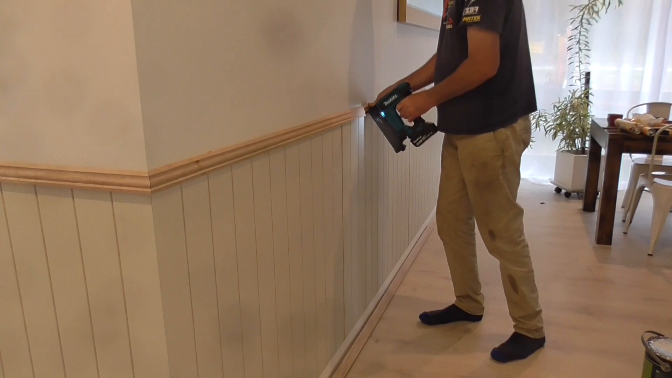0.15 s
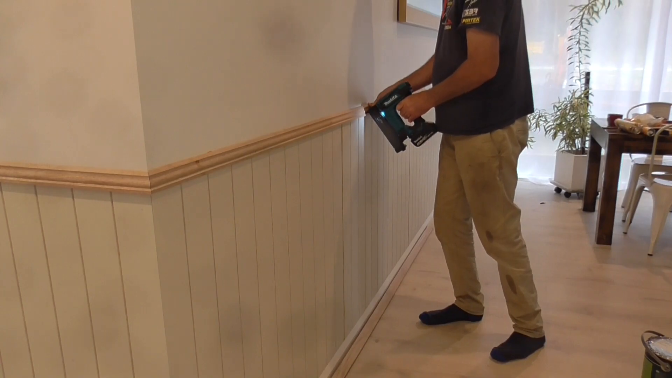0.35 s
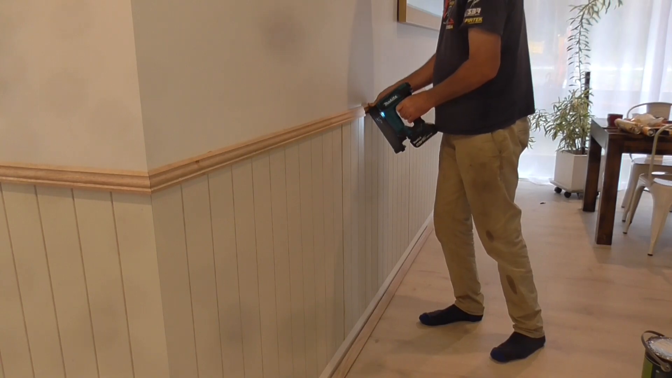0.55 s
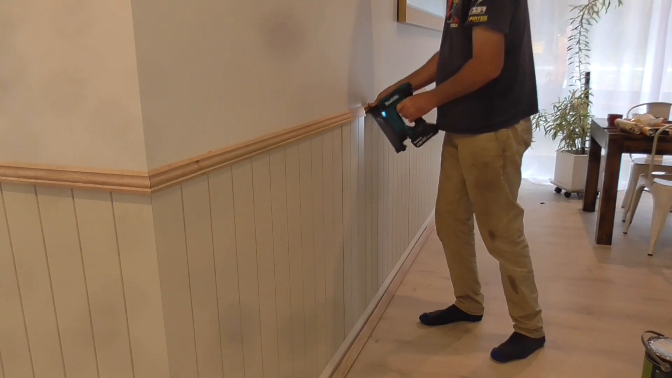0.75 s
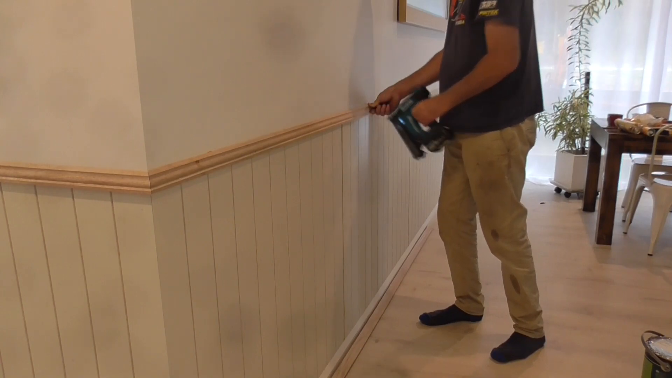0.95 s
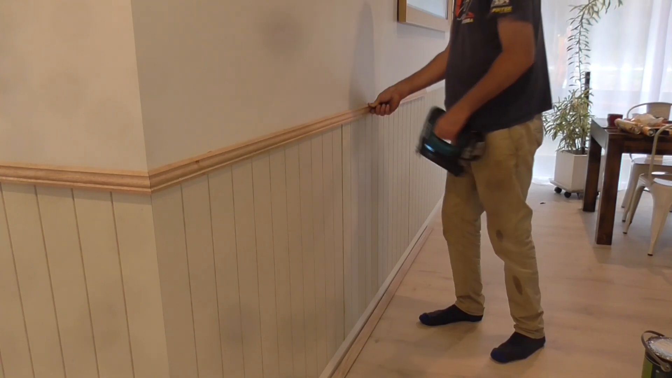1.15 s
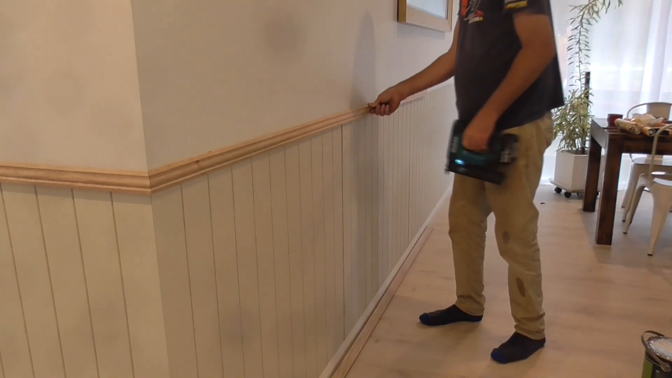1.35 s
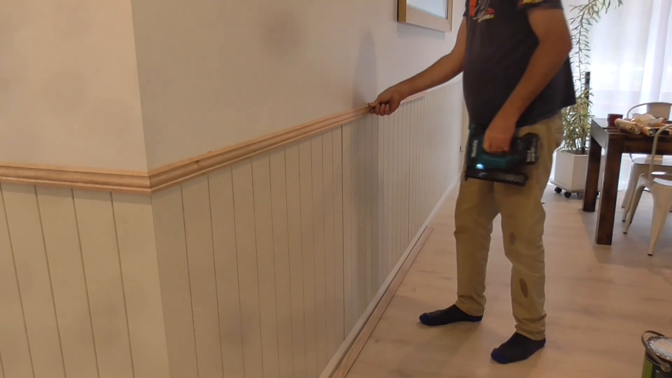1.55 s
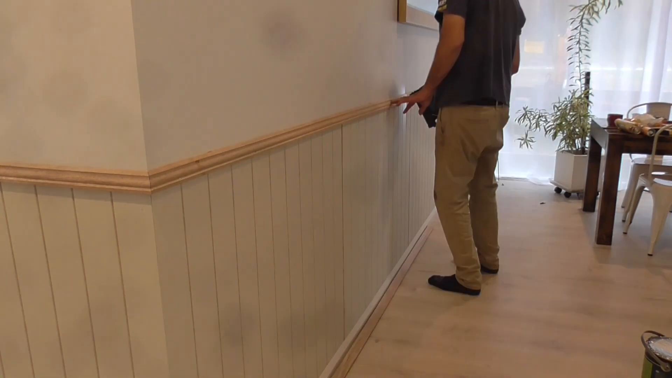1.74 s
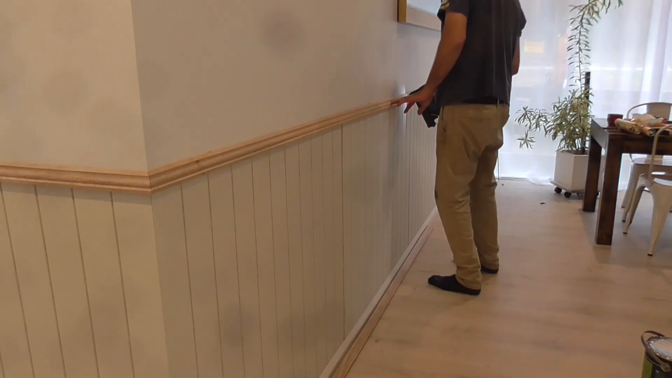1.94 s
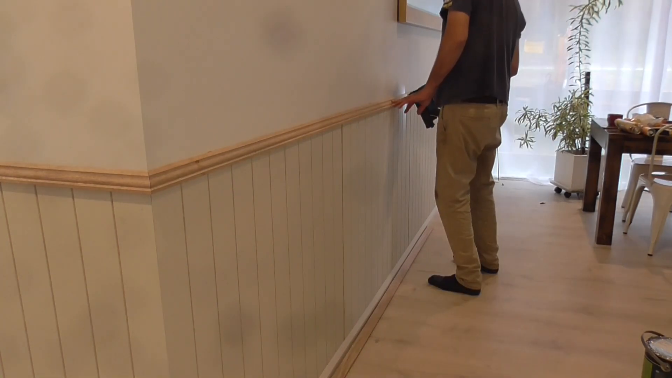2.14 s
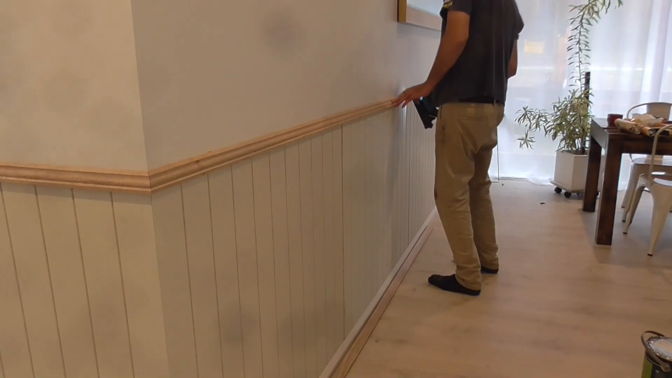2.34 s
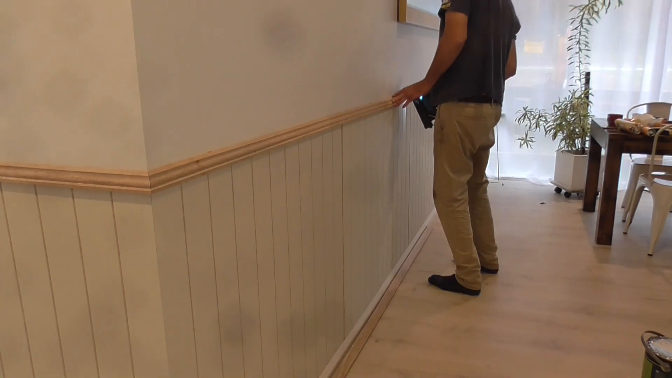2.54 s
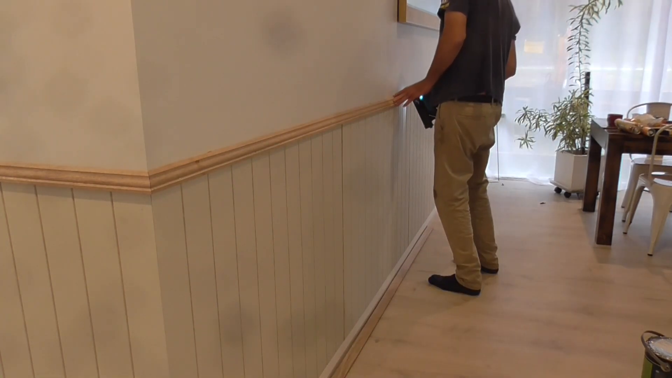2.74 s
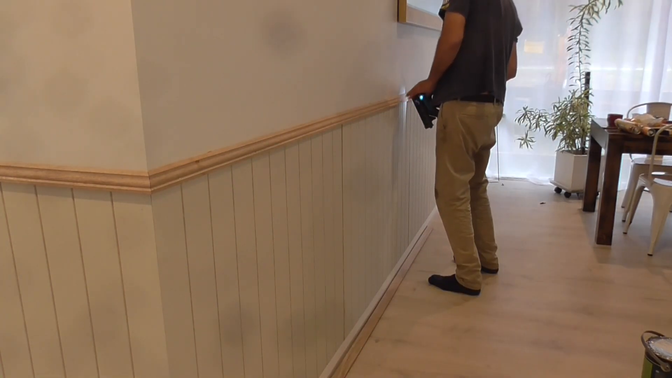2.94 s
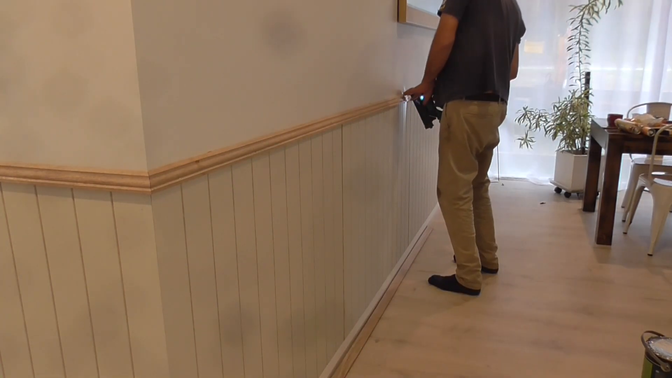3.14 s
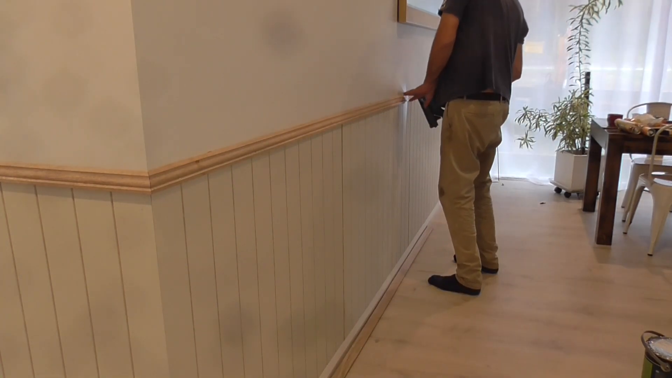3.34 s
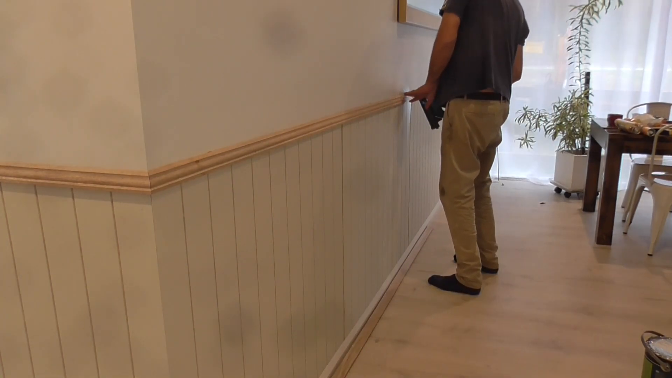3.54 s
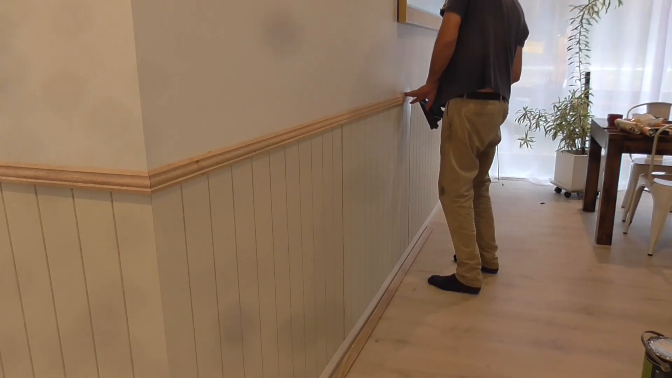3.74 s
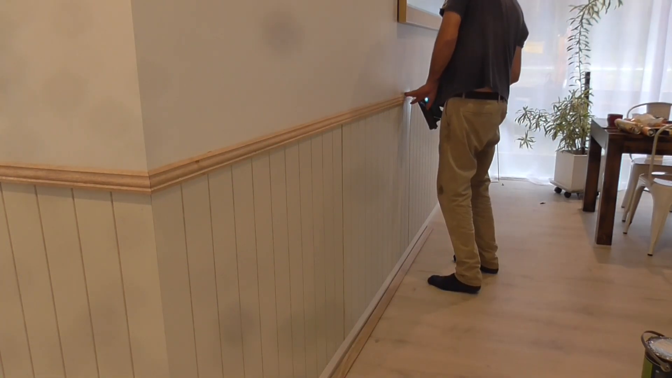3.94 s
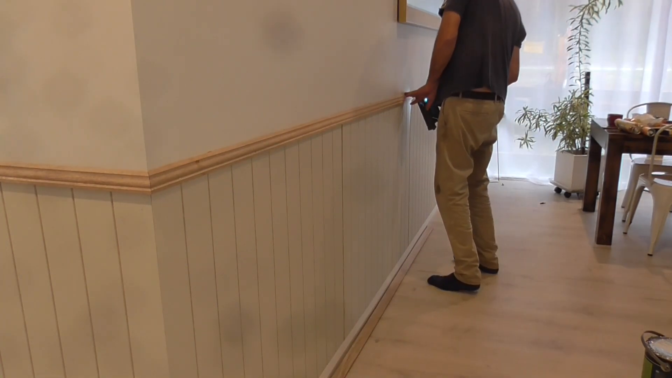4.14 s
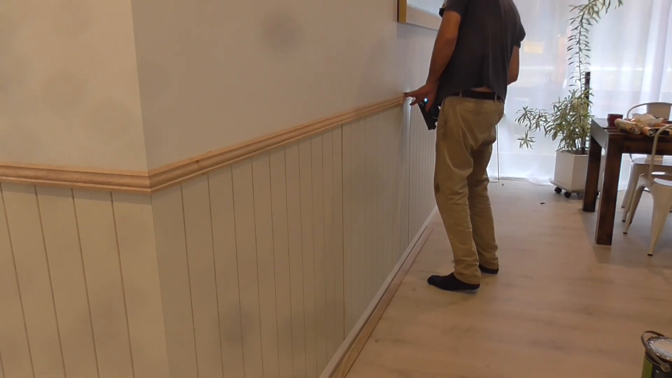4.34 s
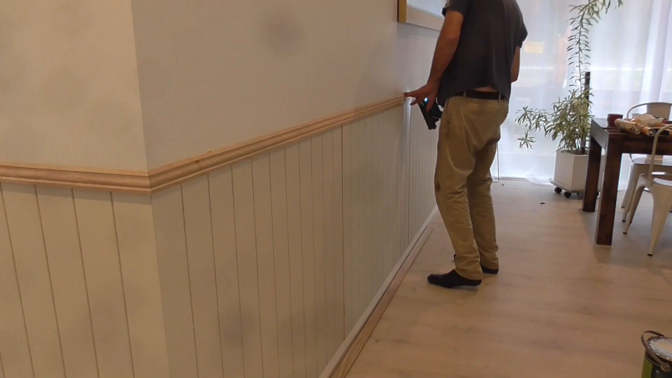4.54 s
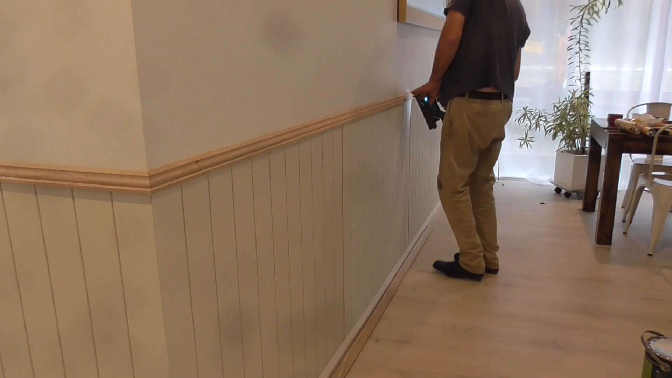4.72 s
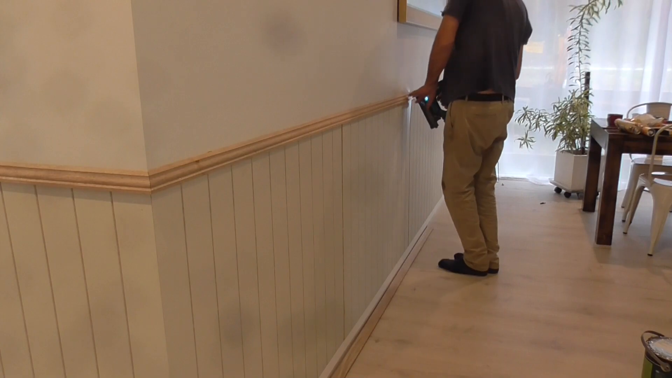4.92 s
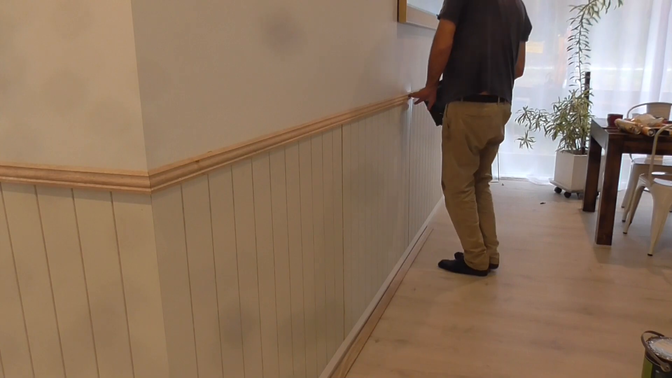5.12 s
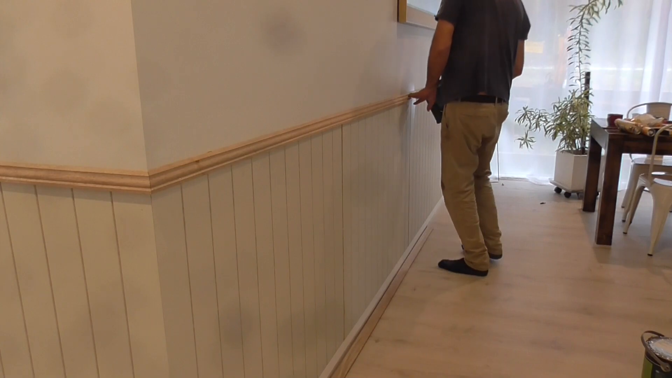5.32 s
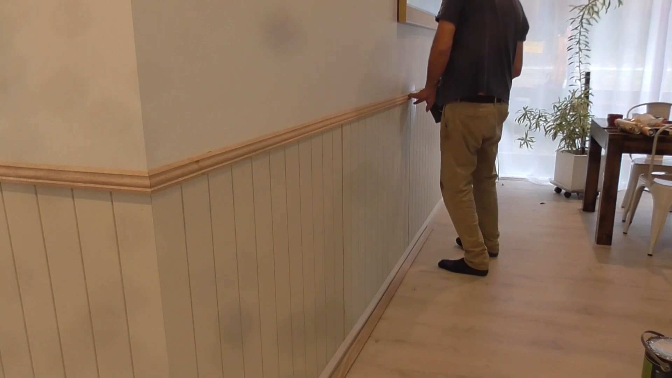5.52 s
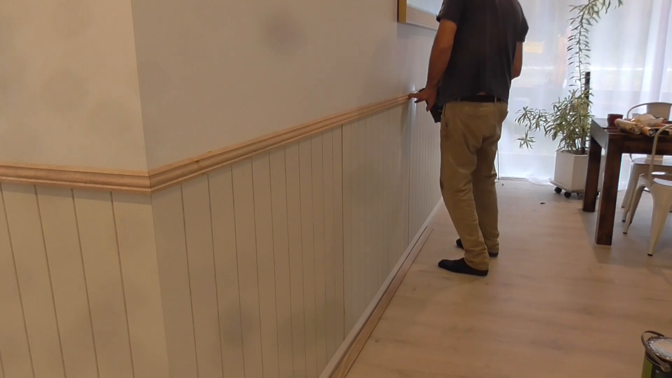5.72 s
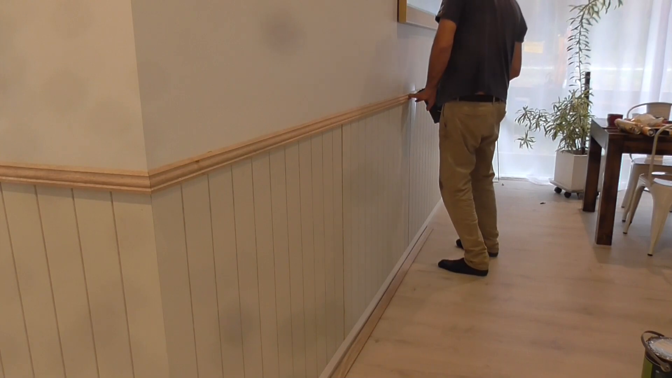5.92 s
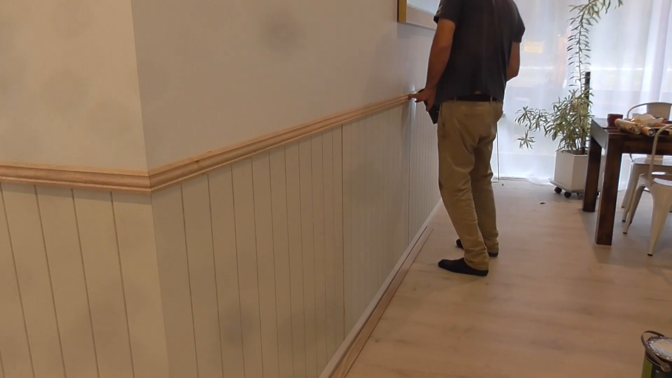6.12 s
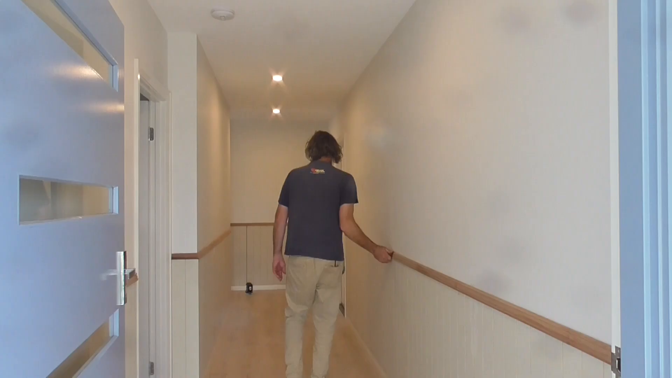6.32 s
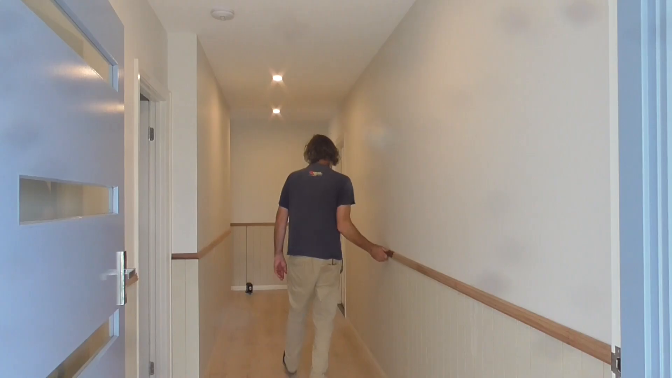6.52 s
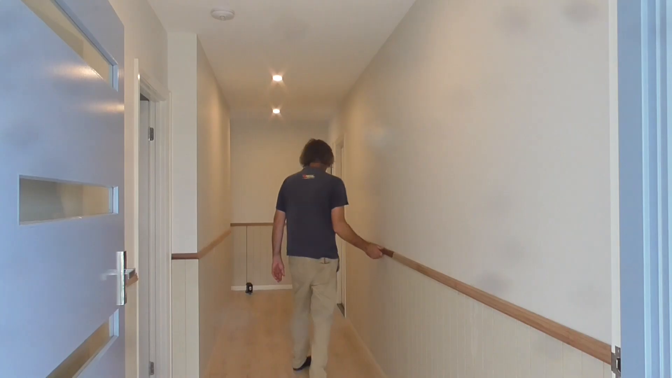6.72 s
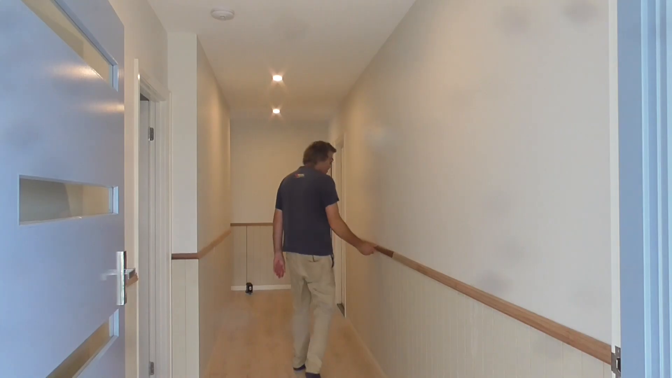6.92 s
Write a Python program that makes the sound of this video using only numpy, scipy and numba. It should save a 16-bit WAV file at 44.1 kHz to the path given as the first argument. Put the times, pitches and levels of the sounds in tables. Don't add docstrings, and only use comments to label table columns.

```python
import sys
import numpy as np
from scipy import signal
from scipy.fft import rfft, irfft
from scipy.io import wavfile
from scipy.ndimage import uniform_filter1d
from numba import njit

SR = 44100
rng = np.random.default_rng(int(sys.argv[2]) if len(sys.argv) > 2 else 0)


def store_pcm(level_fs):
    pcm = np.round(np.clip(level_fs, -1, 1) * 32767).astype(np.int16)
    wavfile.write(sys.argv[1], SR, np.atleast_2d(pcm).T)


def ratio_of_db(decibels):
    return 10 ** (np.asarray(decibels, float) / 20)


N = 307364
OPPOSITE = np.array([[1], [-1]])


def curve(table, hz):
    table = np.array(table, float)
    return [np.interp(np.log(hz + 1), np.log(table[:, 0]), column) for column in table.T[1:]]


def colour(x, table):
    size = 2048
    log_gain = curve(table, np.fft.rfftfreq(size, 1 / SR))[0] * np.log(10) / 20
    cepstrum = irfft(log_gain)
    cepstrum[1:size // 2] *= 2
    cepstrum[size // 2 + 1:] = 0
    taps = irfft(np.exp(rfft(cepstrum)))
    taps = taps / np.sqrt(np.sum(taps ** 2))
    taps = taps.reshape((1,) * (x.ndim - 1) + (-1,))
    return signal.fftconvolve(x, taps, axes=-1)[..., :x.shape[-1]]


def walk(rate):
    hold = int(SR / rate)
    steps = np.repeat(rng.standard_normal(N // hold + 1), hold)
    return 0.63 * uniform_filter1d(uniform_filter1d(steps, hold), hold)[:N]


def add(out, s, x):
    i = int(s * SR)
    out[..., i:i + x.shape[-1]] += x[..., :N - i]


def pan(db):
    return ratio_of_db(np.array([[db], [-db]]) / 2)


def decay(t, t60):
    return np.exp(-np.log(1000) * t / t60)


def bed(table, flicker_db, wide_hz):
    hz = np.fft.rfftfreq(N, 1 / SR)
    mid, side = rfft(rng.standard_normal((2, N))) * ratio_of_db(curve(table, hz)[0])
    both = mid + np.clip(hz / wide_hz, .3, 1) * side * OPPOSITE
    out = 0
    for centre_hz in 31 * 2. ** np.arange(10):
        octave = np.clip(1 - abs(np.log2((hz + 1) / centre_hz)), 0, 1)
        out = out + irfft(both * octave, N) * ratio_of_db(flicker_db * walk(2.5))
    return out / np.sqrt(np.mean(out ** 2))


def burst(t, ms, rise_ms, count):
    shape = np.exp(-t * 1000 / (ms + 0.41)) * np.minimum(t * 1000 / rise_ms, 1)
    spectrum = rfft(rng.standard_normal((count, len(t))) * shape)
    x = irfft(spectrum / (abs(spectrum) + 1e-9), len(t))
    x = x * np.sqrt(shape)
    return x / np.sqrt(np.sum(x ** 2, axis=1, keepdims=True))


# (frequency [Hz], density [dB per Hz])
AIR = [(15, -46), (27, -21), (38, -15), (97, -16.5), (130, -18.5), (166, -21.5), (250, -25), (384, -23),
       (641, -25), (800, -25.5), (1250, -29), (1700, -38.5), (2800, -46), (4140, -40), (6050, -46.5),
       (10000, -42.5), (16000, -52.5)]


def air():
    return ratio_of_db(-62.6) * bed(AIR, 0.38, 6000)


# (start [s], end [s], from [Hz], to [Hz], level [dB])
DRONE = [
    (.98, 1.163, 1490, 1470, -68),
    (1.753, 2.158, 92, 88.7, -61),
    (3.58, 3.808, 695, 690, -71),
    (4.118, 4.455, 99.4, 127.5, -62),
    (6.41, 6.974, 71.2, 73.4, -70),
    (6.5, 6.96, 372.3, 371, -64.5),
    (6.49, 6.7, 1460, 1466, -70.5),
]


def drone():
    out, t = np.zeros(N), np.arange(N) / SR
    for s, end, from_hz, to_hz, db in DRONE:
        glide = np.interp(t, [s, end], [from_hz, to_hz])
        hz = glide * (1 + 0.00395 * walk(17)) + 4 * walk(23.1)
        sounding = uniform_filter1d(1. * (t > s) * (t < end), size=1600)
        out += np.sin(2 * np.pi * np.cumsum(hz) / SR) * ratio_of_db(db + 3 * walk(24)) * sounding
    return out


# (frequency [Hz], density [dB per Hz])
HALL = [(15, -51), (40, -21), (70, 2.5), (106, -10), (221, 0.5), (294, -11.5), (371, -5), (409, -11),
        (1200, -19.5), (1490, -24.5), (2500, -50), (3250, -64), (5500, -120)]
# (frequency [Hz], density [dB per Hz])
SLIDE = [(1180, -27), (2000, -4), (2710, -9.5), (2880, -8), (3650, -1), (6140, -8.5), (9490, -0.5),
         (13000, -7.5), (15100, -18.5), (16000, -17)]
HALL_S = 6.403


def hallway():
    first_touch = np.exp(-abs(np.arange(N) / SR - HALL_S) / 0.076)
    slide_db = -60.5 + 4.5 * first_touch + 1.6 * walk(60) + 0.64 * walk(4.2)
    return bed(SLIDE, 1.1, 10000) * ratio_of_db(slide_db) + bed(HALL, 2.9, 2400) * ratio_of_db(-53.5)


# (frequency [Hz], level [dB], side share [0-1])
ROOM = [(80, -4.5, 0.5), (160, 2.5, 0.24), (323, 1, 0.26), (647, -1.5, 0.38), (1340, 0.5, 0.37),
        (2800, 0, 0.45), (4900, 3.5, 0.45), (7800, -2.5, 0.8), (11100, -6.5, 0.6), (14760, -5, 0.9)]
ROOM_T60 = [0.83, 0.6, 0.79, 0.64, 0.75, 0.68, 0.6, 0.51, 0.39, .38]


def room(x):
    t = np.arange(SR * 3 // 2) / SR
    hz = np.fft.rfftfreq(len(t), 1 / SR)
    noise, tail = rfft(rng.standard_normal((2, len(t)))), 0
    for k, ((_, db, side), t60) in enumerate(zip(ROOM, ROOM_T60)):
        weight = curve([(row[0], j == k) for j, row in enumerate(ROOM)], hz)[0]
        band = irfft(noise * weight, len(t))
        fade = decay(t, t60) + np.exp(-t / 0.012)
        stereo = band[0] + side * band[1] * OPPOSITE
        tail = tail + ratio_of_db(db) * stereo * fade / np.sqrt(np.sum(fade ** 2))
    build_up = np.clip((t - .003) / 0.0031, 0, 1)
    return signal.fftconvolve(x[None], tail * build_up, axes=-1)[:, :N]


# (time [s], frequency [Hz], level [dB], t60 [s], rise [ms])
RINGS = [(.134, 1265, -46.5, 0.11, 4.8), (3.333, 1067, -46, 0.12, 4), (5.112, 1050, -47, .1, 7.3),
         (.1735, 162.5, -22.5, 0.077, 1.9), (.175, 520, -30, 0.068, 1.6), (.402, 1250, -24.5, .04, 2.2),
         (1.6825, 8400, -45, 0.011, 0.37), (1.6825, 10100, -51, .012, .4), (2.196, 280, -44, .12, 5.5),
         (2.398, 140, -33.5, 0.085, 4), (2.404, 1150, -40.5, 0.071, 3), (2.4, 2040, -51, 0.045, 3),
         (3.907, 1240, -34.5, .025, 1.5), (3.908, 300, -38.5, 0.11, 3), (3.943, 1270, -38, 0.034, 2),
         (4.065, 1260, -51, .08, 5.7), (4.103, 1253, -44.5, .05, 2), (5.926, 201, -40, 0.11, 4),
         (6.016, 1240, -46, .03, 2), (6.026, 230, -38.5, .08, 3.7), (6.186, 170, -38, 0.1, 4),
         (6.23, 320, -44.5, .08, 4)]
# (time after the slack [s], frequency [Hz], level [dB], t60 [s])
SPRINGS = [
    (0.001, 4100, -59.5, .04),
    (0.001, 5030, -64, .02),
    (0.0183, 4160, -56.5, .04),
    (0.0187, 7100, -52.5, .02),
    (.0185, 8760, -53, .008),
]


def rings():
    out, t = np.zeros(N), np.arange(8000) / SR
    rows = RINGS + [(s + SLACK_S + late, hz, db, t60, .6) for s, *_ in SHOTS for late, hz, db, t60 in SPRINGS]
    for s, hz, db, t60, rise_ms in rows:
        pair = np.sin(2 * np.pi * hz * t) + .45 * np.sin(2 * np.pi * (hz * 1.06 * t + rng.random()))
        rise = np.minimum(t * 1000 / rise_ms, 1) ** 2
        add(out, s, ratio_of_db(db) * pair * decay(t, t60) * rise)
    return signal.sosfilt(signal.butter(2, 110, "highpass", fs=SR, output="sos"), out)


# (time [s], peak [dB], 3-5 kHz minus top [dB])
CLICKS = [(.0084, -45, -31), (0.1355, -55, -11), (0.1471, -49, -11.5), (.162, -34.5, -12),
          (0.169, -26.5, -3.5), (0.377, -35.5, -4), (0.8712, -44, -11.5), (2.1684, -40, -2.5),
          (2.183, -37, -9), (2.3471, -53, -4.5), (2.376, -44, -2), (2.389, -35.5, -3), (3.908, -30.5, -16),
          (3.9431, -30, -7), (4.1036, -43, -4.5), (4.1236, -57, 6.5), (5.0762, -51, -19),
          (5.5901, -50.5, -37), (5.9347, -41, -8.5), (5.972, -49, -2.5), (6.015, -52.5, 1),
          (6.0718, -54, -15), (6.1696, -52.5, 0)]
# (time [s], peak [dB], left minus right [dB], 3-5 kHz minus top [dB])
LATCHES = [
    (0.8939, -21.5, -3, -7.5),
    (3.367, -20, -4, -10),
    (5.1392, -19.5, -4, -8.5),
]
DRIVER_DB = [-21, -13, -13]
TRIGGER_DB = [-41, -40, -42]
CLICK_PAN_DB = SHOT_PAN_DB = -3


def click_rows():
    rows = [(s, db, low_db, 4.5, CLICK_PAN_DB) for s, db, low_db in CLICKS]
    for s, db, pan_db, low_db in LATCHES:
        rows += [(s + LIFT_S, db - 18.5, -20, 14, pan_db),
                 (s - .001, db + 0.5, low_db, 3.0, pan_db),
                 (s + REBOUND_S, db - 14.5, -3, 3.0, pan_db)]
    for (s, _, clutch_db, *_), driver_db, trigger_db in zip(SHOTS, DRIVER_DB, TRIGGER_DB):
        rows += [(s + SLACK_S, -69, 15, 2.5, .3),
                 (s + TRIGGER_S, trigger_db, -4, 3.5, SHOT_PAN_DB),
                 (s + CLUTCH_S, clutch_db + HIDDEN_DB, -21, 5.0, SHOT_PAN_DB),
                 (s + DRIVER_S, driver_db + HIDDEN_DB, 1.5, 4.5, SHOT_PAN_DB)]
    return rows


# (frequency [Hz], density [dB per Hz])
CLICK = [(3500, -18), (5200, -15.5), (6400, -7), (7500, -1.5), (9500, -2), (11500, -7), (13500, -14.5),
         (16000, -31.5)]


def clicks():
    top, low = np.zeros((2, 2, N))
    t = np.arange(1024) / SR
    for s, db, low_db, ms, pan_db in click_rows():
        mid, side, clack = burst(t, ms, 0.38 * ms, count=3) * ratio_of_db(db + 10.0)
        add(top, s, pan(pan_db) * (mid + 0.43 * side * OPPOSITE))
        add(low, s, pan(pan_db) * clack * ratio_of_db(low_db))
    clack_body = [(1200, -23.5), (2200, -8.0), (3800, 4.0), (5000, 2.0), (6200, -12.0), (8000, -32.5)]
    return colour(top, CLICK) + colour(low, clack_body)


# (time [s], peak [dB], 60-200 Hz [dB], 700-1600 Hz relative [dB])
KNOCKS = [(.002, -42.5, -8, -6), (.059, -41, -5, -8), (0.135, -42, -2, -3), (0.163, -33.5, -3, 3),
          (.172, -21.5, -4.5, -9.5), (2.158, -37.5, -3.5, -3.5), (2.164, -34.5, 3, -2.5),
          (2.182, -29.5, -7.5, -14.5), (2.2, -37, -3.5, -8), (2.226, -36, -0.5, -17),
          (2.246, -43.5, -4, -16), (2.375, -32, -13, -5), (2.389, -29, -4, -5), (2.401, -34.5, 1.5, -13),
          (2.433, -37, -19.5, -16), (2.626, -39.5, -10.5, -16), (3.333, -50, -16, 10.5),
          (5.115, -46, 3, 5.5), (3.368, -33.5, -5.5, -21), (3.905, -30.5, -21, -8),
          (3.914, -30.5, -4, -16.5), (3.944, -29, -19.5, -6), (3.959, -33.5, -6.5, -13.5),
          (3.986, -36, -8, -12), (4.07, -42, -13.5, 0.5), (4.104, -39, 1.5, 0), (4.11, -30.5, -20, -21),
          (5.925, -37, 5, -13), (5.947, -36, 8, -3.5), (5.936, -37.5, 4.5, -12), (5.997, -39, -1, -20),
          (6.03, -42, 3, -19), (6.017, -32.5, -2, -9), (6.074, -33, -22, -14), (6.17, -41.5, -10, 2.5),
          (6.181, -30.5, -3, -12.5), (6.194, -34, 1.5, -24)]
HOLLOW_DB = [-20.5, -7.5, -4]


def knock_rows():
    rows = [(max(s - .0025, 0), *row, 7.1, 0.5) for s, *row in KNOCKS]
    for s, db, *_ in LATCHES:
        rows += [(s - .012, db - 26.5, -6, 12, 9.0, -1.5),
                 (s - .001, db - 21, -10, 9, 3.5, -6)]
    for (s, blow_db, clutch_db, *_), mid_db in zip(SHOTS, HOLLOW_DB):
        rows += [(s + JOLT_S, -39.5, -15, 6, 6.0, -3),
                 (s + CLUTCH_S - .002, clutch_db + HIDDEN_DB - 15.0, -23, 1.5, 6.0, mid_db),
                 (s, blow_db + HIDDEN_DB, -17.0 + mid_db / 2, -3.5, 4.0, mid_db)]
    return rows


# (frequency [Hz], level [dB], t60 [s])
PANEL = [(93.1, -5.5, 0.072), (135, 0, 0.027), (169, 0, 0.079), (292, -6.5, 0.1), (333.8, -5.5, 0.1),
         (406.7, -10, 0.13), (520, 1, 0.03), (242, -13, 0.043), (740, 3, 0.0086), (884, -6, 0.026),
         (1035, -4, 0.02), (1194, -0.5, 0.018), (1470, -16, 0.04), (2040, -16, 0.036)]


def knocks():
    out = np.zeros(N)
    t = np.arange(12000) / SR
    hz, mode_db, t60 = np.transpose(PANEL)[:, :, None]
    for s, db, low_db, high_db, ms, mid_db in knock_rows():
        chance = rng.standard_normal((len(PANEL), 2))
        zone_db = np.where(hz < 200, low_db, np.where(hz > 650, high_db + 5, mid_db * (hz < 370)))
        level = ratio_of_db(mode_db + zone_db + np.clip(chance[:, :1], -1, 1) * 2)
        modes = level * np.sin(2 * np.pi * hz * (1 + 0.041 * chance[:, 1:]) * t) * decay(t, t60)
        contact = burst(t[:2048], ms, 0.52 * ms, count=1)[0]
        add(out, s, ratio_of_db(db - 10.0) * signal.fftconvolve(modes.sum(0), contact))
    return signal.sosfilt(signal.butter(3, [95, 3200], "bandpass", fs=SR, output="sos"), out)


# (time [s], frequency [Hz], width [Hz], level [dB], t60 [s])
BOARDS = [(.497, 410, 32, -28, 0.7), (.497, 334, 19, -26, .6), (.497, 174, 22, -32.5, 0.67),
          (4.551, 140, 35, -26.5, 0.55), (.497, 417, 14, -40, 1.97), (.497, 1400, 70, -27, 0.25),
          (2.779, 1060, 110, -20, 0.59), (2.779, 610, 90, -23, 0.61), (4.551, 1200, 110, -26.5, 0.4),
          (4.551, 890, 56, -24, 0.5), (2.78, 150, 22, -26, 0.75), (4.551, 295, 34, -20, 0.59),
          (0.498, 525, 27, -24.5, 0.18), (2.778, 335, 65, -11, 0.71), (2.778, 270, 30, -18.5, 0.68),
          (2.778, 395, 41, -22, 0.85), (2.779, 515, 120, -14, 0.63), (2.779, 227, 81, -29, 0.63),
          (4.551, 333.6, 35, -12.5, 0.61), (4.551, 497, 104, -12, 0.64), (4.55, 177.9, 98, -20.5, 0.71)]
BOOM_S = [0.74, .5, 0.43]


def boards():
    out, t = np.zeros(N), np.arange(SR) / SR
    hz = np.fft.rfftfreq(SR, 1 / SR)
    for s, centre_hz, width_hz, db, t60 in BOARDS:
        resonance = np.exp(-((hz - centre_hz) / width_hz) ** 2)
        ring = irfft(rfft(rng.standard_normal(SR)) * resonance, SR)
        ring = ring / (abs(signal.hilbert(ring)) + 1e-9) ** .3
        boom_s = np.interp(s, np.transpose(SHOTS)[0], BOOM_S)
        shape = decay(t, t60) * np.minimum(t / 0.0052, 1) * np.clip((boom_s - t) / 0.12, 0, 1)
        add(out, s, ratio_of_db(db) * ring / ring.std() * shape)
    return out


def teeth(t):
    rate = 445 * (1 - .25 * np.exp(-np.maximum(t, 0) / .02))
    chance = rng.standard_normal((256, 2))
    turns = np.cumsum(rate * (t > 0)) / SR
    k = turns.astype(int)
    late = np.clip(.12 + .07 * chance[k, 0], 0, .4)
    since_ms = (turns - k - late) / rate * 1000
    tick = (since_ms > 0) * np.exp(-abs(since_ms) / .38) * ratio_of_db(2 * np.clip(chance[k, 1], -2, 1))
    running = np.exp(-np.maximum(t - STOP_S + WIND_S, 0) / .015)
    return 1.85 * (ratio_of_db(-8) + tick * running)


HIDDEN_DB = 13
SLACK_S, TRIGGER_S, JOLT_S, WIND_S = -.154, -.1365, -.104, -.098
CLUTCH_S, DRIVER_S, STOP_S = -.074, -.006, .0069
LIFT_S, REBOUND_S = -.013, .013
# (blow time [s], blow [dB], clutch [dB], winding [dB], winding rise [ms])
SHOTS = [
    (.497, -17, -11, -31.5, 2.8),
    (2.779, -7, -1.5, -22.5, 4.9),
    (4.551, -7, -7.5, -21.5, 4.9),
]
# (frequency [Hz], density [dB per Hz])
WIND = [(88, -47), (150, -13.5), (280, -15), (439, -8), (578, 1), (662, -10), (1170, -2.5), (1720, -10),
        (2100, -9.5), (6260, -10), (8400, -0.5), (11500, -0.5), (13200, -11), (16000, -20)]


def winding():
    out = np.zeros((2, N))
    t = np.arange(18000) / SR - .01
    for s, _, _, db, rise_ms in SHOTS:
        lead_in = ratio_of_db(-33) * np.clip(1 + t / .01, 0, 1) ** 2
        rise = np.clip(t * 1000 / rise_ms, 0, 1) ** 2
        coast = np.exp(-np.maximum(t - (STOP_S - WIND_S), 0) / .079 - t / 1.2)
        load = 1 - .3 * np.exp(-np.maximum(t, 0) / .012)
        shape = (lead_in + rise) * coast * load
        mid, side = 1.47 * np.tanh(rng.standard_normal((2, len(t))))
        hiss = mid + np.diff(side, 2, prepend=[0, 0]) / 3 * OPPOSITE
        add(out, s + WIND_S - .01, pan(SHOT_PAN_DB) * shape * teeth(t) * hiss * ratio_of_db(db + HIDDEN_DB))
    return colour(out, WIND)


def scene():
    tool, wall, parts = clicks() + winding(), knocks(), rings()
    direct = tool + ratio_of_db(-2.5) * wall * pan(-1.1) + parts * pan(-1.5)
    reverberant = room(ratio_of_db(-0.54) * tool.mean(0) + wall + ratio_of_db(-8.5) * parts) * pan(-0.53)
    near = direct + reverberant + air() * pan(-1.3)
    place = np.where(np.arange(N) < HALL_S * SR, near, hallway())
    return place + drone() * pan(-2.57) + boards() * pan(-.5)


@njit
def squeeze(x, top, ratio, attack, release):
    gain, level = np.ones(len(x)), 0.
    for i in range(len(x)):
        level += (x[i] - level) * (attack if x[i] > level else release)
        if level > top:
            gain[i] = (top / level) ** (1 - 1 / ratio)
    return gain


def low_pass(x):
    return signal.sosfilt(signal.butter(12, 16000, fs=SR, output="sos"), x)


def record(dry):
    envelope = uniform_filter1d(abs(dry).mean(0), 60)
    gain = squeeze(envelope, ratio_of_db(-25.5), 8., 1 / (.001 * SR), 1 / (.17 * SR))
    x = dry * np.roll(gain, -SR // 300)
    x = signal.sosfilt(signal.butter(2, 28, "highpass", fs=SR, output="sos"), x)
    rounded = np.tanh(1.895 * x) / 0.84
    mix = signal.sosfilt(signal.ellip(6, .5, 50, 16150, fs=SR, output="sos"), rounded)
    return low_pass(mix)


dry = scene()
out = record(dry)
store_pcm(out)
```